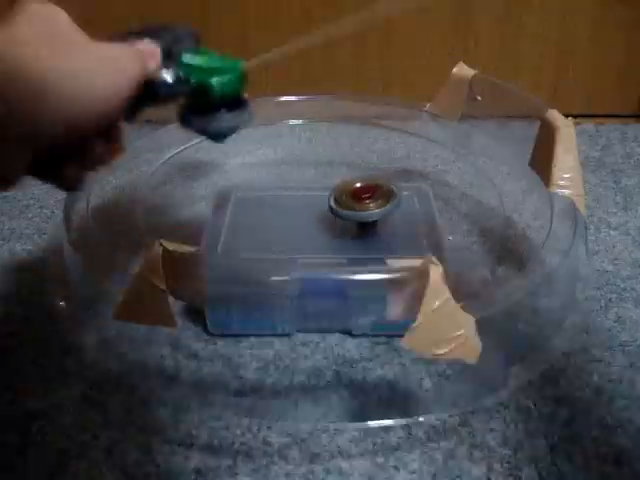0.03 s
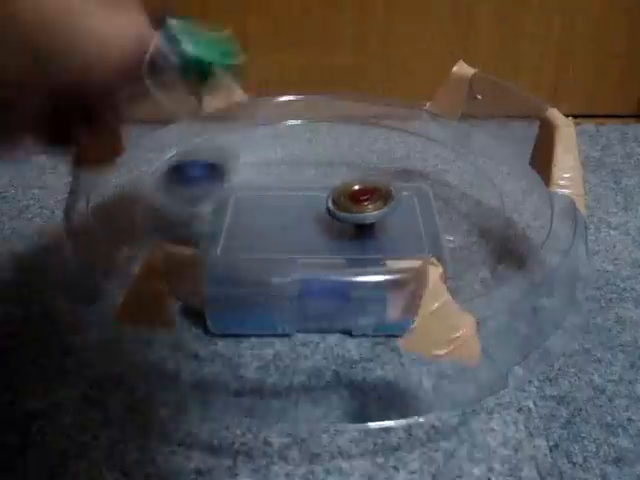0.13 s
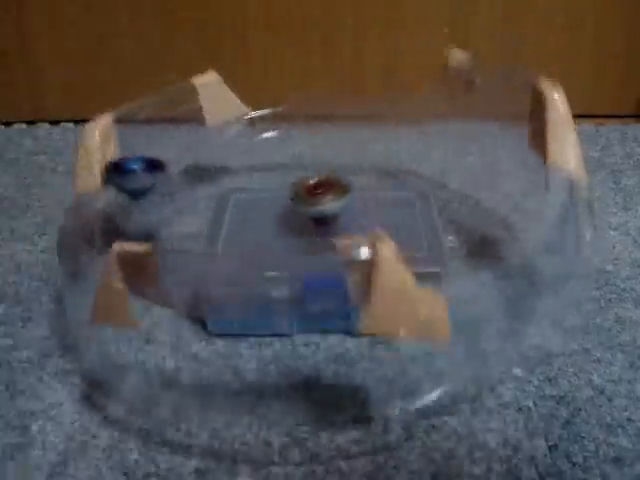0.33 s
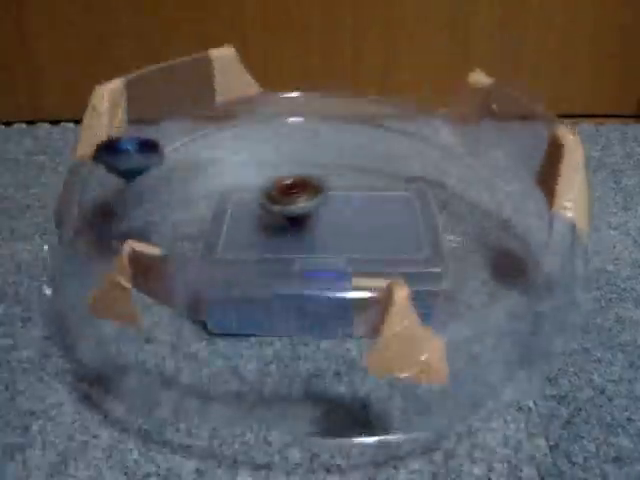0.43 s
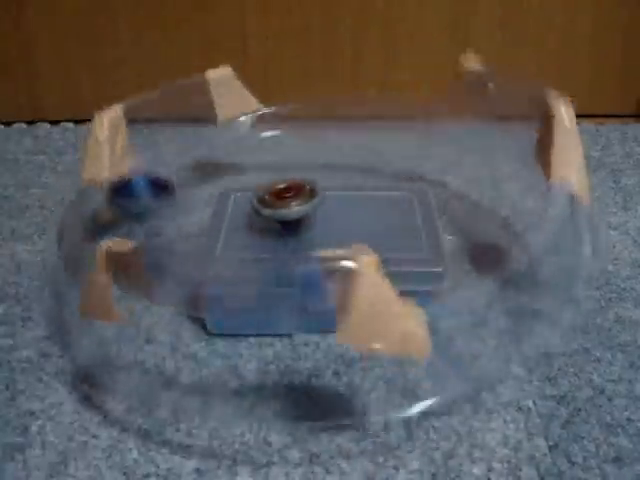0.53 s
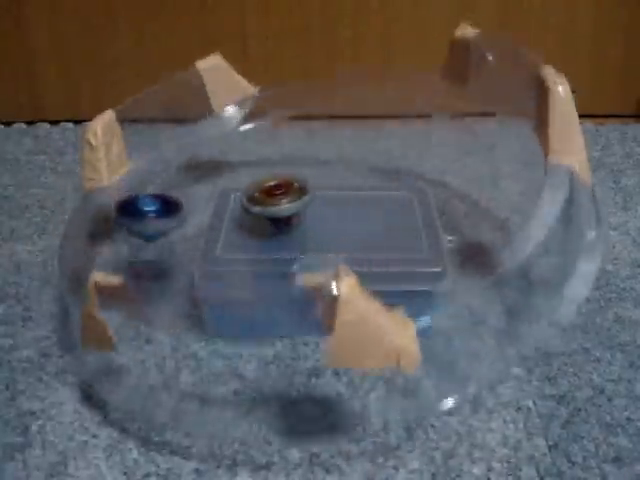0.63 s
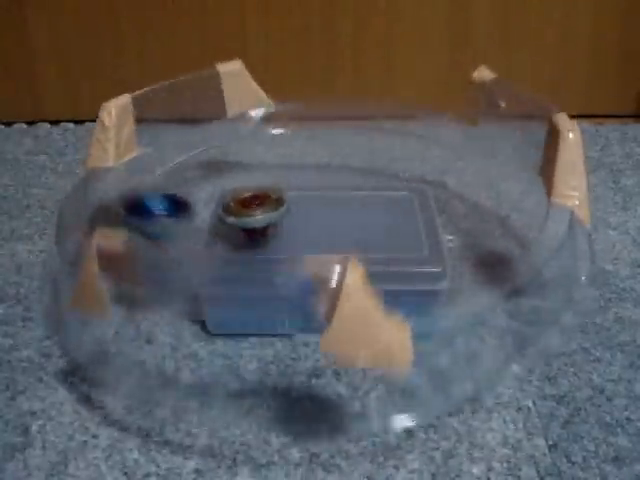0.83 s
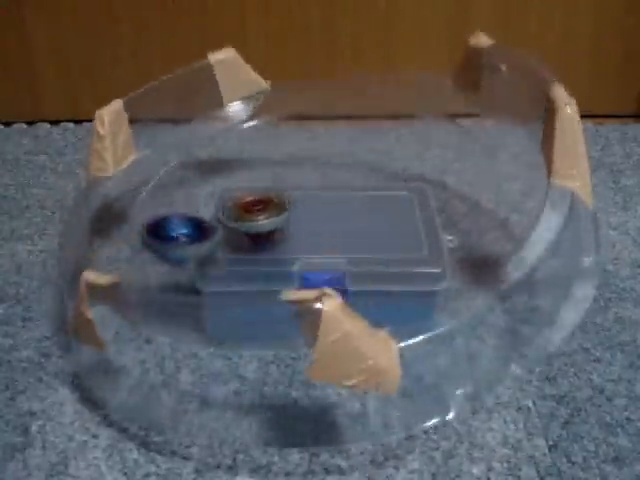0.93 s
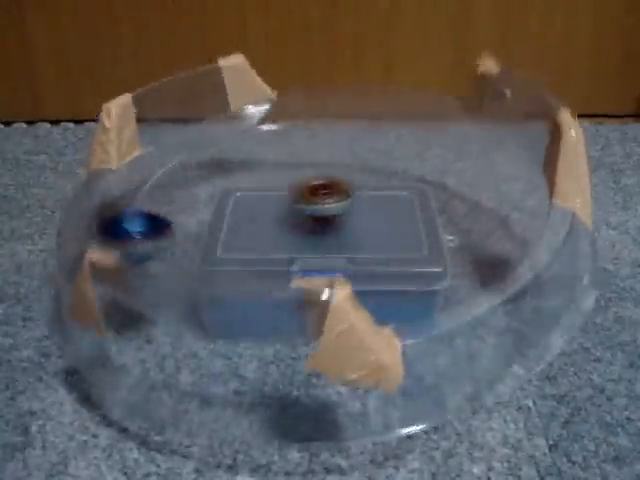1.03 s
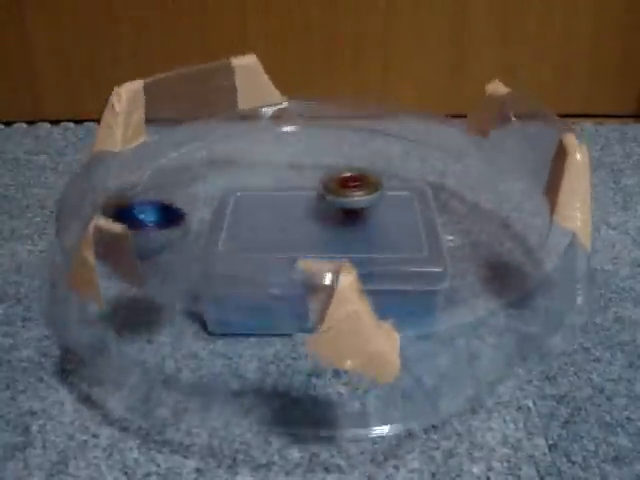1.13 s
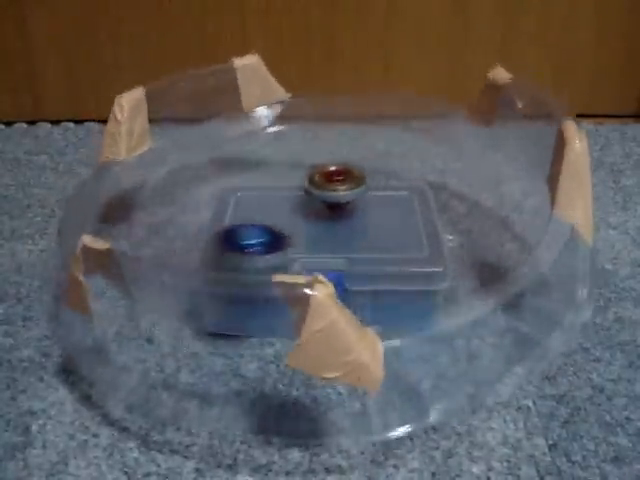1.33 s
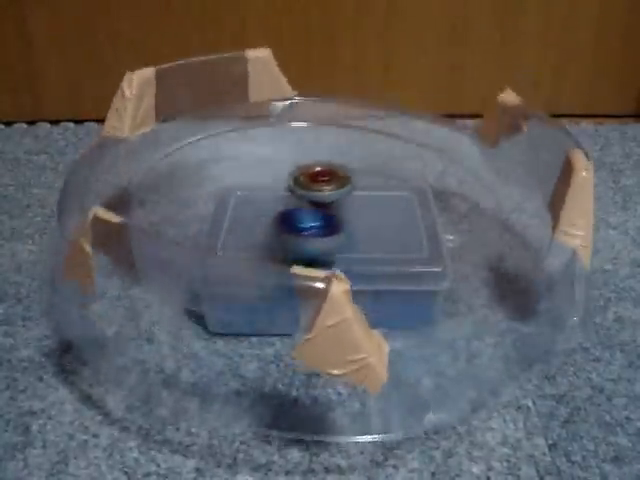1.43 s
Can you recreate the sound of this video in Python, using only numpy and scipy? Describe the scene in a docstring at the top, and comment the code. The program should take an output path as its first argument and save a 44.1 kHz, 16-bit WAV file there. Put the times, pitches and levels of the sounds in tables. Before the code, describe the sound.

A toy top is launched with a quick, rising ripcord whir and clatters into a thin plastic arena. It rolls with a scratchy rumble, knocking on the plastic and clicking against a second top in a small room.

```python
"""Over the faint rolling of a tip, a ripcord whirs a toy top up to speed, rising in pitch with its tooth rate.
The top drops into a thin plastic arena and bounces to rest on its tip: the impacts excite the dish's
modes, and the hardest thump it against the floor. The top then rolls round the dish, rumbling and
scratching over tiny bumps, knocks on the plastic and clashes rim to rim with a second spinning top.
A small room adds a short reverberation throughout."""
import sys
import numpy as np
from scipy import signal
from scipy.io import wavfile
from scipy.ndimage import uniform_filter1d

SR = 44100
rng = np.random.default_rng(int(sys.argv[2]) if len(sys.argv) > 2 else 0)


def unload_wav(signal):
    """Save mono or channel-first audio to the path in sys.argv[1] as 16-bit WAV at rate SR, clipped to [-1, 1]."""
    wavfile.write(
        sys.argv[1],
        SR,
        np.round(np.clip(np.atleast_2d(signal).T, -1, 1) * 32767).astype(np.int16),
    )


N = 66150
T = np.arange(N) / SR


def amp(db):
    """Converts decibels to an amplitude ratio."""
    return 10 ** (np.asarray(db) / 20)


def unit_energy(x):
    """Normalises the sum of squares to 1."""
    return x / np.sqrt(np.sum(x ** 2) + 1e-20)


def unit_rms(x):
    """Normalises the mean square to 1."""
    return unit_energy(x) * np.sqrt(len(x))


def value_at(points, hz):
    """Interpolates a curve on a logarithmic frequency axis."""
    freq_hz, value = np.transpose(points)
    return np.interp(np.log(hz + 1), np.log(freq_hz), value)


def add(mix, start_s, sound):
    """Superposition: a sound adds to the mix from its start time."""
    part = mix[max(round(start_s * SR), 0):][:len(sound)]
    part += sound[:len(part)]


def colour(x, spectrum, extra_db=lambda hz: 0, size=2048):
    """Minimum-phase filtering: the phase follows from the log magnitude by the Hilbert transform."""
    hz = abs(np.fft.fftfreq(size, 1 / SR)) + 1
    log_gain = np.log(amp(value_at(spectrum, hz) + extra_db(hz)))
    taps = np.fft.ifft(np.exp(np.conj(signal.hilbert(log_gain)))).real[:size // 2]
    return signal.fftconvolve(x, taps)[:len(x)]


def impact(contact_t60_s, ring_t60_s, ring_db, rise_s=.0016, size=6000):
    """Damped vibration: brief contact chatter and a ring of dense modes, both as decaying noise."""
    t = T[:size]
    contact, body = rng.standard_normal((2, size)) * (1 - np.exp(-t / rise_s))
    chatter = unit_energy(contact * amp(-60 * t / contact_t60_s))
    ring = unit_energy(body * amp(-60 * t / ring_t60_s))
    return chatter + amp(ring_db) * ring


def at_level(x, level_db):
    """Equal energy: a hit carries as much as 10 ms of steady sound at this level."""
    return amp(level_db) * unit_energy(x) * np.sqrt(SR / 100)


def room(x, wet_db, build_s=.0046, size=22050):
    """Reverberation: a diffuse field builds up, then decays at its own rate in each band."""
    # reverberation time of the room: freq_hz, t60_s
    decay = [(100, 0.33), (500, 0.17), (1500, .33), (4000, 0.24), (8000, 0.17), (15000, 0.39)]
    hz, t, bands = signal.stft(rng.standard_normal(size), SR, nperseg=256)
    tail = signal.istft(bands * amp(-60 * t / value_at(decay, hz)[:, None]), SR)[1][:size]
    build_up = 1 - np.exp(-(T[:size] / build_s) ** 2)
    response = amp(wet_db) * unit_energy(tail * build_up)
    response[0] += 1  # direct sound
    return signal.fftconvolve(x, response)[:N]


def rolling(bumps_per_s=2600, spread_db=3.5):
    """Roughness excitation: spinning tips trip on tiny bumps; the dish rumbles, the contact scratches."""
    # strength of the rolling: time_s, rumble_db, scratch_db
    levels = [(0.029, -53.5, -46), (.12, -53, -46), (.33, -43, -38), (.46, -29.5, -30.5), (.58, -32.5, -31),
              (.63, -36.5, -47), (.70, -37, -43), (.82, -46.5, -48), (.91, -44.5, -43.5),
              (1.09, -46, -45.5), (1.29, -46.5, -52.5), (1.37, -46, -60), (1.44, -42.5, -52.5),
              (1.5, -65, -51)]
    # spectrum of the dish's rumble: freq_hz, gain_db
    rumble = [(30, -33), (100, -22.5), (220, -10), (340, -4), (440, -3.5), (530, -0.5), (800, -4),
              (1450, -6.5), (2500, -14), (8000, -32)]
    # tone colour of the scratch as heard; above 10 kHz the treble drops away: freq_hz, gain_db
    scratch = [(100, -4.5), (800, 1), (2000, 5), (4200, 5), (7500, -1), (9600, -7), (11000, -20),
               (15500, -12)]
    time_s, rumble_db, scratch_db = np.transpose(levels)
    out = np.zeros(N)
    for spectrum, level_db in ((rumble, rumble_db), (scratch, scratch_db)):
        bumps = (rng.random(N) < bumps_per_s / SR) * rng.choice([-1, 1], N)
        jolts = bumps * amp(spread_db * rng.standard_normal(N))
        texture = unit_rms(colour(room(jolts, wet_db=-4), spectrum))
        out += texture * amp(np.interp(T, time_s, level_db))
    return out


def arena_resonance(drive, gain_db=-54.5):
    """Modal resonance: the driven dish rings on in its low modes, each a damped sinusoid."""
    # low modes of the dish: freq_hz, relative_db, t60_s
    modes = [(226, -16, .3), (358, -9, 0.29), (456.5, -3.5, 0.17), (516.3, -1, 0.81), (591.4, -5.5, 0.22),
             (628, -1.5, 0.22), (699, 3.5, 0.3), (790, -39, 0.15), (1069, -3, 0.052), (1143, -15, 0.17),
             (1250, -22, 0.13), (1267, -34, 0.26), (1344, -20, 0.23), (1668, -3.5, 0.17)]
    t = T[:N // 2]
    response = sum(amp(db - 60 * t / t60_s) * np.cos(2 * np.pi * hz * t) for hz, db, t60_s in modes)
    return drive + amp(gain_db) * signal.fftconvolve(drive, response)[:N]


def launcher(tooth_jitter=.07, spread_db=2.5, rasp_gain=1.73):
    """Impulse-train excitation: cord teeth snap ever faster over the gear and rattle the housing."""
    # speed of the ripcord: time_s, tooth_rate_hz
    pull = [(.03, 150.3), (.13, 261.1), (.165, 481), (.2, 834), (.212, 987.4), (.23, 1449), (.275, 2539),
            (.3, 3178), (.35, 3393)]
    # strength of the gear's whir: time_s, level_db
    gear = [(.1, -67), (.135, -44), (.165, -39), (.205, -26.5), (.245, -16), (.275, -16.5), (.297, -12.5),
            (.318, -15), (.332, -19.5), (.36, -26), (.44, -32), (.5, -90)]
    # tone colour of the whir as heard; above 10 kHz the treble drops away: freq_hz, slow_cord_db, fast_cord_db
    whir_colour = [(35, -40, -18), (70, -29, -19), (140, -16, -16.5), (234, -0.5, -11.5), (523, -8, -21),
                   (970, 3.5, -4.5), (1750, -3, -7), (3000, -3.5, -0.5), (4440, -0.5, 0), (6270, -12, -2),
                   (8000, -8.5, -10.5), (9870, -22, -15.5), (10600, -23, -24.5), (15500, -22, -17)]
    bright_hz, skid_hz = 1280, 2382  # tooth rates where the whir brightens and skidding smears its pitch
    rate_hz = np.interp(T, *np.transpose(pull))
    jitter = tooth_jitter * (1 + (rate_hz / skid_hz) ** 2)
    wander = unit_rms(uniform_filter1d(rng.standard_normal(N), size=60))
    teeth_passed = np.cumsum(rate_hz * np.exp(jitter * wander)) / SR
    snaps = np.diff(np.floor(teeth_passed), prepend=0)
    snaps *= amp(spread_db * rng.standard_normal(N)) / np.sqrt(rate_hz)
    snaps -= uniform_filter1d(snaps, size=600)  # removes the steady offset
    rasp = rng.standard_normal(N) * np.exp(-2 * (teeth_passed % 1))  # a noise burst on each tooth
    rattle = unit_rms(snaps) + rasp_gain * unit_rms(rasp)
    slow = unit_rms(colour(rattle, [(hz, db) for hz, db, _ in whir_colour]))
    fast = unit_rms(colour(rattle, [(hz, db) for hz, _, db in whir_colour]))
    whir = fast + (slow - fast) * np.exp(-(rate_hz / bright_hz) ** 2)
    return room(whir * amp(np.interp(T, *np.transpose(gear))), wet_db=-8)


def knocks(gain_db=-3.5, emphasis_width_oct=.3):
    """Plate vibration: each struck spot of thin plastic favours its own pitch; soft blows are duller."""
    # blows on the plastic: start_s, relative_db, pitch_hz, emphasis_db
    blows = [(.205, -22.5, 942, 25.5), (.308, -21.5, 990, 15), (.3155, -20, 1060, 53),
             (.3492, -11, 1460, 8.5), (.354, -12, 1260, 10), (0.3639, -11, 1234, 15), (0.3734, -8, 1350, 5),
             (.380, -12.5, 1780, 11), (0.387, -13, 1190, 8.5), (.393, -13, 584, -2),
             (.402, -13, 1300, 12.5), (.411, -13.5, 1400, 0), (.4195, -15.5, 1620, 12),
             (.428, -19, 1190, 3), (.443, -28, 1623, 10), (.4825, -15, 1140, 19), (.5335, -20, 1020, 16),
             (.550, -24.5, 990, -10), (0.5666, -24.5, 970, 23), (.5855, -20, 412, 17), (.598, -24, 890, -7),
             (.605, -25.5, 990, 21), (0.712, -31, 1160, 25), (.724, -20, 1127, 21.5),
             (.943, -24.5, 1120, 18), (0.9518, -17, 1066, 21), (.9645, -25, 1120, 9), (.969, -23, 1830, 12),
             (1.2094, -30.5, 790, 12), (1.2205, -28, 984, 22), (1.2424, -33, 930, 13),
             (1.350, -44, 1040, 20), (1.386, -32, 940, -2), (1.3944, -23.5, 860, 16),
             (1.401, -25, 620, 11.5), (1.417, -32, 584, 10)]
    # spectrum of the sheet's dense ring: freq_hz, gain_db
    sheet = [(40, -53), (110, -38.5), (220, -14), (330, -11.5), (550, 0.5), (850, -3.5), (1600, -2),
             (2400, -4), (4500, -14.5), (8000, -26), (15000, -25)]
    soft_db, dull_per_db = -18, .66  # each dB below soft_db steepens the treble slope (dB per octave)
    out = np.zeros(N)
    for start_s, relative_db, pitch_hz, emphasis_db in blows:
        dull_db_per_oct = dull_per_db * max(soft_db - relative_db, 0)

        def spot_db(hz):
            octaves = np.log2(hz / pitch_hz)
            peak_db = emphasis_db / (1 + (octaves / emphasis_width_oct) ** 2)
            return peak_db - dull_db_per_oct * np.clip(octaves, 0, 2)

        knock = colour(impact(contact_t60_s=.015, ring_t60_s=.045, ring_db=6.5), sheet, spot_db)
        add(out, start_s, room(at_level(knock, relative_db + gain_db), wet_db=-6.5))
    return out


def thumps():
    """Impulse response: the hardest jolts push the whole dish against the floor."""
    # jolts of the dish: start_s, level_db
    jolts = [(.325, -47), (0.351, -37), (.374, -37), (.643, -58), (0.968, -49), (1.148, -49), (1.177, -60)]
    # spectrum of the dish's weight on the floor: freq_hz, gain_db
    weight = [(20, -24), (60, 2), (120, 12), (200, -13), (340, 15.5), (700, -40), (3000, -66)]
    thump = colour(signal.unit_impulse(N), weight)
    out = np.zeros(N)
    for start_s, level_db in jolts:
        add(out, start_s, at_level(thump, level_db))
    return out


def clashes(tones_db=-25.5, tones_t60_s=.03, size=6000):
    """Hard collision: the rims click and chatter; a sharper contact gives more treble."""
    # collisions of the rims: start_s, level_db, tilt_db_per_oct
    collisions = [(.352, -18, -8), (0.354, -27, -7), (0.385, -25.5, 1), (.434, -26, -3.5),
                  (.484, -22.5, -3), (.491, -34, -8), (0.5069, -24.5, -4), (0.529, -35, 0), (.541, -34, 5),
                  (0.547, -25.5, -1.5), (0.5711, -27.5, -2.5), (.586, -22.5, -17.5), (.598, -28.5, -6.5),
                  (.6185, -49, -16), (0.6416, -20.5, 2), (.647, -28, 8), (0.653, -24, 5), (0.661, -27, 4),
                  (0.728, -23.5, -0.5), (.735, -30, -2), (.913, -37, 1), (0.9427, -32.5, -13.5),
                  (.9535, -39, -24), (0.9682, -21.5, -1.5), (.9755, -28, -2.5), (.9855, -29, -1.5),
                  (.997, -30, -1), (1.1504, -29.5, -3), (1.162, -26.5, 6), (1.169, -28, -9.5),
                  (1.181, -26.5, 6.5), (1.394, -47.5, 8)]
    # tone colour of the clicks as heard; above 10 kHz the treble drops away: freq_hz, gain_db
    click_colour = [(50, -43), (200, -35.5), (600, -44), (1500, -20), (2200, -6.5), (3200, 3.5),
                    (4500, 0.5), (6200, 0.5), (9700, -5), (10500, -17), (15500, -18.5)]
    # brief high tones that brighten each click: freq_hz, relative_db
    high_tones = [(3303, -14), (3705, -8), (4093, -11), (4841, 1), (5250, -3), (5651, -1.5), (6364, -1.5),
                  (6900, -5), (7300, -2.5), (8100, -2)]
    out, t = np.zeros(N), T[:size]
    for start_s, level_db, tilt_db_per_oct in collisions:
        sharpness_db = lambda hz: tilt_db_per_oct * np.log2(np.clip(hz, 800, 8000))
        tones = sum(amp(db) * rng.standard_normal() * np.sin(2 * np.pi * hz * t) for hz, db in high_tones)
        tones *= amp(tones_db - 60 * t / tones_t60_s)
        click = impact(contact_t60_s=.027, ring_t60_s=.036, ring_db=5, size=size)
        clash = colour(click + tones, click_colour, sharpness_db)
        add(out, start_s, room(at_level(clash, level_db), wet_db=-1.5))
    return out


def scene():
    """Superposition: all sources sum in one channel, with knocks and rolling driving the dish's modes."""
    return (launcher() + arena_resonance(knocks() + rolling()) + clashes() + thumps())[None]


def record(dry, onset_s=.031, fade_s=.002, cutoff_hz=15800):
    """Saturation and band limiting: the sound fades in, its peaks rounded and its top treble removed."""
    fade_in = np.clip((T - onset_s) / fade_s, 0, 1)
    rounded = dry / (1 + dry ** 6) ** (1 / 6)
    low_pass = signal.firwin(511, cutoff_hz, window=("kaiser", 9), fs=SR)
    return signal.oaconvolve(rounded * fade_in, low_pass[None], "same")


dry = scene()
out = record(dry)
unload_wav(out)
```